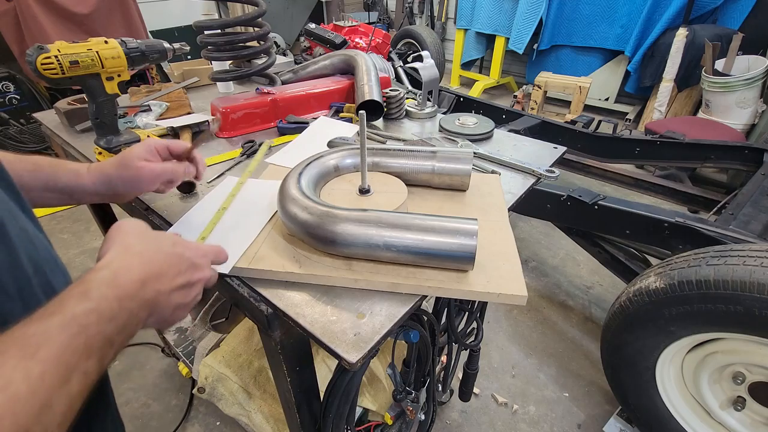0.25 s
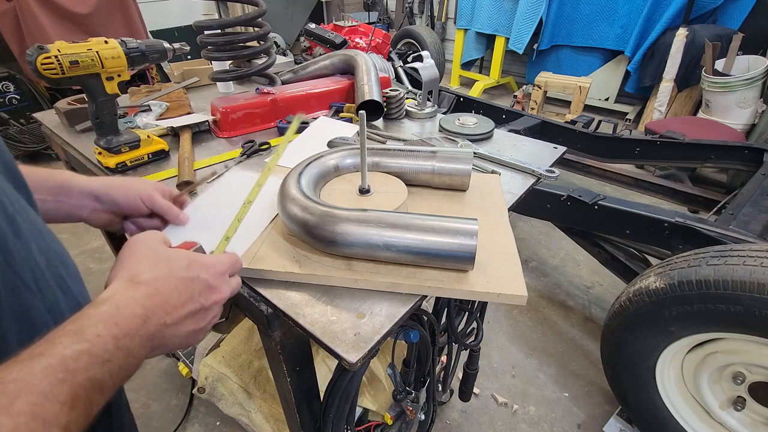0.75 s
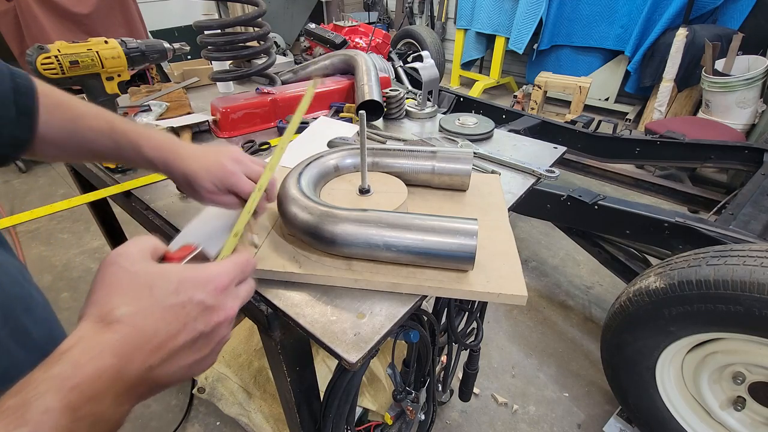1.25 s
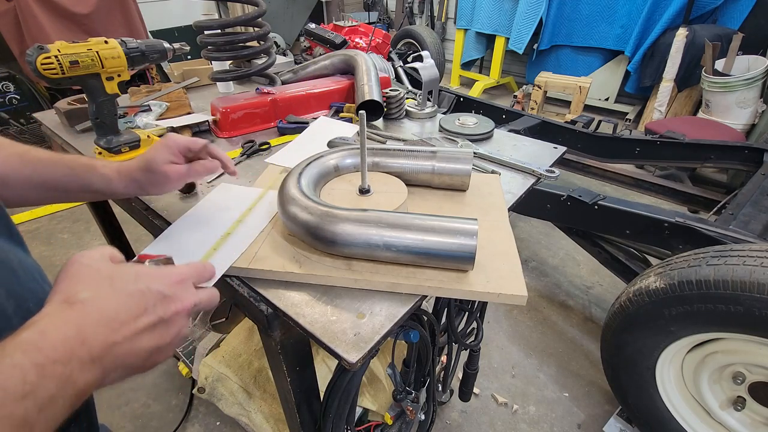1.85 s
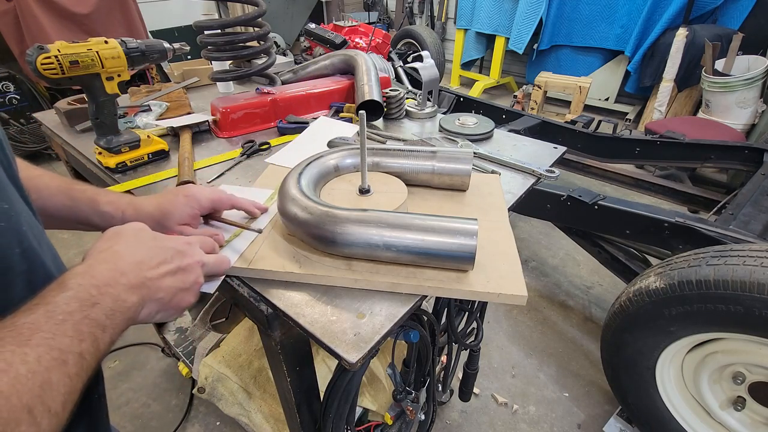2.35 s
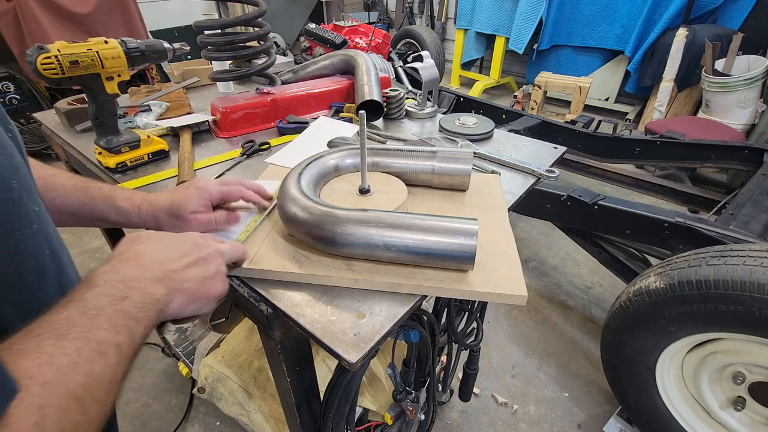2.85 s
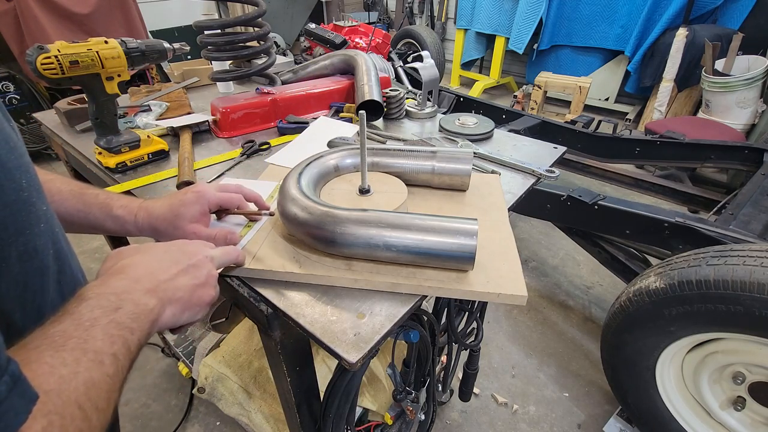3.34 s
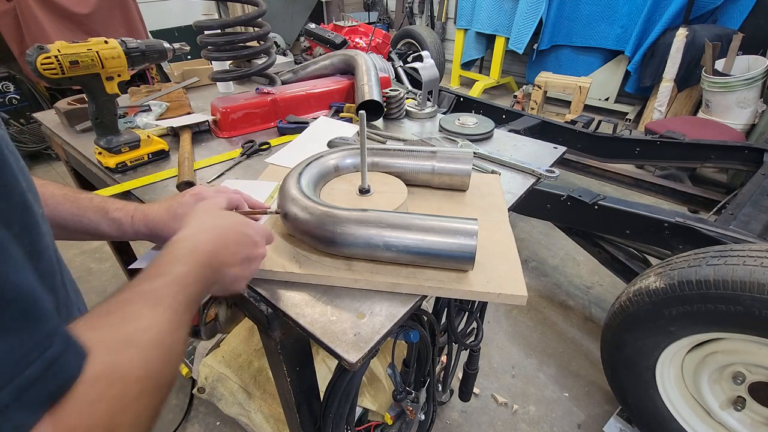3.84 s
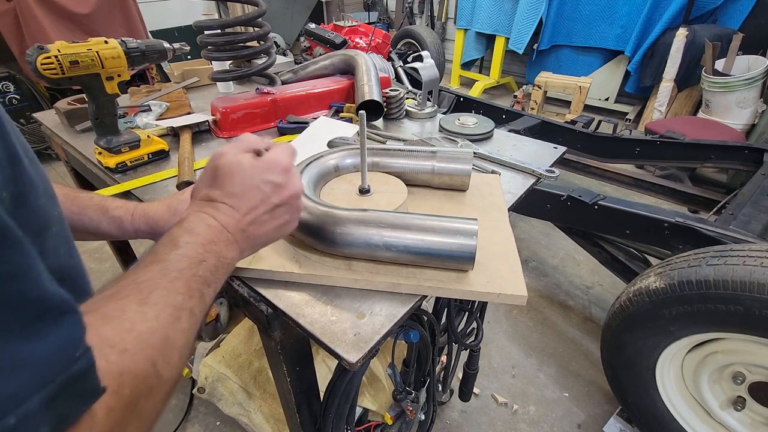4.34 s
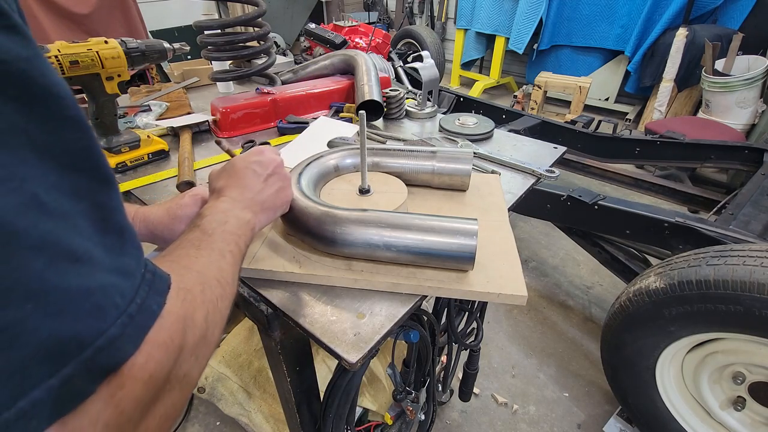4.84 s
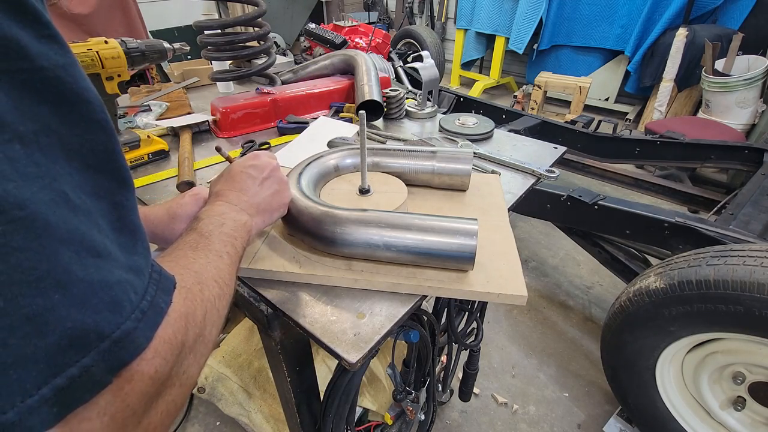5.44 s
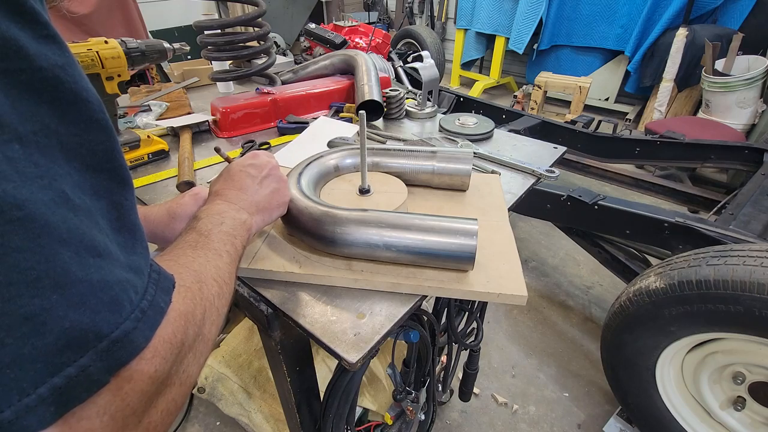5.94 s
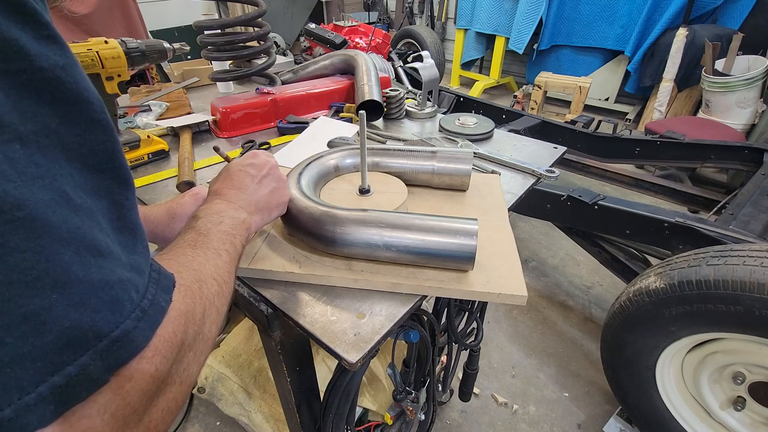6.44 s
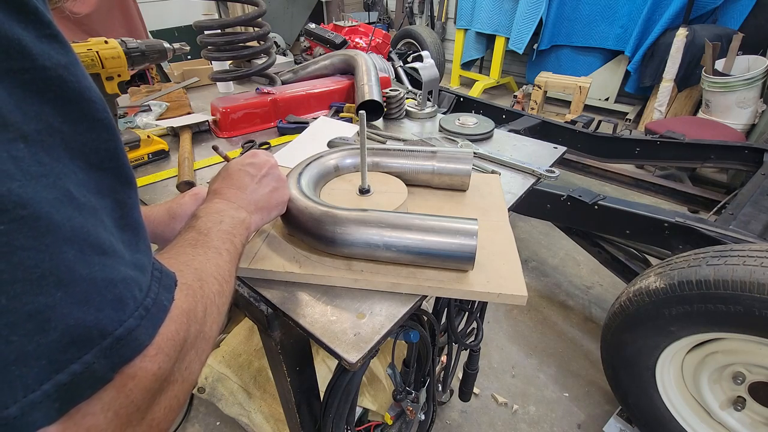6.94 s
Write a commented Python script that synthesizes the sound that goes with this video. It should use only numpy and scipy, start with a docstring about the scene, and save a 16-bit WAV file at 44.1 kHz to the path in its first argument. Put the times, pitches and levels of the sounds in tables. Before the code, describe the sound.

Ticks and papery scrapes of a tape measure on poster board, a sharp plastic clatter, then faint pen strokes in a quiet garage.

```python
"""A steel tape measure is handled on a stiff poster board at a garage workbench. Impacts of blade, hook
and fingers tick, and sliding friction hisses while the bending board pops. The blade snaps once, ringing
and chattering in its modes; the plastic case bounces on the bench; the blade hums faintly. A pen then
draws short, faint strokes. Under it all lies a diffuse rumble and hiss, and the garage's reverberation
follows every tick."""
import sys
import numpy as np
from scipy import signal
from scipy.fft import rfft, irfft, next_fast_len
from scipy.io import wavfile
from scipy.ndimage import uniform_filter1d, map_coordinates

SR = 44100
rng = np.random.default_rng(int(sys.argv[2]) if len(sys.argv) > 2 else 0)


def generate_wav(sig):
    """Save sig (samples, or channels by samples) to the path in sys.argv[1] as 16-bit PCM at SR."""
    pcm = np.round(np.clip(np.atleast_2d(sig).T, -1, 1) * 32767).astype(np.int16)
    wavfile.write(sys.argv[1], SR, pcm)


N = 316885
SPAN, PAD = 32768, 256  # samples: one short sound; margin before time zero
HZ = np.fft.rfftfreq(SPAN, 1 / SR)
T = np.arange(SPAN) / SR
SCENE_T = np.arange(N) / SR


def amp(db):
    """Amplitude ratio of a level in decibels."""
    return 10 ** (np.asarray(db) / 20)


def unit(x):
    """Normalisation to rms 1."""
    return x / np.sqrt(np.mean(x ** 2) + 1e-20)


def along(points, hz):
    """Interpolation of (frequency, value) points on a logarithmic frequency axis."""
    freqs, values = np.transpose(points)
    return np.interp(np.log(hz + 1), np.log(freqs + 1), values)


def filtered(x, response):
    """Linear filtering: the spectrum of x times a frequency response."""
    size = next_fast_len(N + SR // 2)
    return irfft(rfft(x, size) * response(np.fft.rfftfreq(size, 1 / SR)), size)[..., :N]


def band(hz, low_hz, high_hz):
    """Causal band-pass response with second-order slopes."""
    return (1j * hz / low_hz / (1 + 1j * hz / low_hz) / (1 + 1j * hz / high_hz)) ** 2


def resonances(peaks, hz):
    """Forced response of damped resonators, summed with alternating signs."""
    return sum((-1) ** k * amp(db) * 1j * hz * width / (centre ** 2 - hz * hz + 1j * hz * width)
               for k, (centre, width, db) in enumerate(peaks))


def ring(modes, longest_s):
    """Free vibration: damped modes of random phase and slightly random strength, t60 up to longest_s."""
    return sum(amp(db + rng.normal(0, 1.1) - 60 * T / min(t60, longest_s))
               * np.sin(2 * np.pi * hz * T + rng.uniform(0, 2 * np.pi)) for hz, db, t60 in modes)


def wobble(rate):
    """Smooth random modulation with rate knots a second."""
    knots = rng.standard_normal(int(N * rate / SR) + 4)
    return map_coordinates(knots, [np.arange(N) * rate / SR])


def grit(depth_db, rate):
    """Random amplitude modulation breaks noise into uneven grains."""
    return amp(depth_db * wobble(rate)) * rng.standard_normal(N)


def patchy(x, depth_db=3):
    """Spectral modulation: random gain in short patches of time and frequency."""
    spectra = signal.stft(x, nperseg=256)[2]
    field = uniform_filter1d(rng.standard_normal(spectra.shape), size=3, axis=0)
    field = uniform_filter1d(field, size=8, axis=1)
    return signal.istft(spectra * amp(depth_db * unit(field)), nperseg=256)[1][:N]


def crackle(per_s):
    """A Poisson process of clicks of very uneven size."""
    hits = rng.random(N) < per_s / SR
    return unit(hits * amp(3 * rng.exponential(size=N)) * rng.standard_normal(N))


def bursts(peak_s, db, swell_s, fade_s, hold_s=0):
    """Envelope of incoherent bursts, which add in power; swell_s and fade_s each span 20 dB."""
    step = 16
    after = np.arange(0, N, step) / SR - np.array(peak_s)[:, None]
    swell_s, fade_s, hold_s = (np.reshape(v, (-1, 1)) for v in (swell_s, fade_s, hold_s))
    drop = np.maximum(-after / swell_s, 0) + np.maximum((after - hold_s) / fade_s, 0)
    power = amp(np.array(db)[:, None] - 20 * drop) ** 2
    return np.repeat(np.sqrt(power.sum(axis=0)), step)[:N]


# Width of the diffuse field: frequency_hz, side_minus_mid_db
DIFFUSE_WIDTH = [(60, -15.5), (110, -13), (200, -9.5), (380, 1), (700, 0), (1290, 2.5), (2380, -3.5),
                 (4400, -5.5), (8120, 1), (15000, -3)]
def diffuse(hz):
    """A diffuse field arrives from all around and divides its power between mid and side."""
    side = amp(along(DIFFUSE_WIDTH, hz))
    return np.array([np.ones_like(side), side]) / np.sqrt(1 + side ** 2)


# Phase difference between the microphone ports: frequency_hz, left_lead_rad
PORT_PHASE = [(60, -0.5), (300, 1), (1200, 1), (3200, 4), (5000, 1.59), (9000, 2), (15000, 0.4)]
def ports(hz, pan_db):
    """Direct sound reaches two ports with level and phase differences; pan_db is left minus right."""
    turn = np.exp(.5j * along(PORT_PHASE, hz))
    return np.array([amp(pan_db / 2) * turn, amp(-pan_db / 2) / turn])


# Reverberation time of the garage: frequency_hz, t60_s
GARAGE_DECAY = [(200, 0.49), (1000, 0.39), (3000, 0.29), (6000, 0.25), (14000, .2)]
def garage_echo():
    """Reverberation as a fresh stereo spectrum: diffuse noise decays exponentially, treble first."""
    hz, t, spectra = signal.stft(rng.standard_normal((2, SR // 2)), SR, nperseg=256)
    fade = amp(-60 * t / along(GARAGE_DECAY, hz)[:, None]) * np.clip(t / .0071, 0, 1)
    mid, side = signal.istft(spectra * fade * diffuse(hz)[..., None], SR, nperseg=256)[1]
    pair = np.array([mid + side, mid - side])
    return rfft(pair / np.linalg.norm(pair[0]), SPAN)


def blank():
    """Stereo silence with a margin at each end."""
    return np.zeros((2, PAD + N + SPAN))


def place(out, start_s, sound, pan_db, echo_db):
    """Superposition of a short sound's direct and reverberant parts onto a padded track."""
    paths = ports(HZ, pan_db) + amp(echo_db) * garage_echo()
    delay = np.exp(-2j * np.pi * HZ * PAD / SR)
    start = round(start_s * SR)
    out[:, start:start + SPAN] += irfft(rfft(sound, SPAN) * paths * delay, SPAN)


def spread(x, pan_db, echo_db):
    """A long sound arrives directly and by convolution with the garage's impulse response."""
    echo = signal.fftconvolve(x[None], irfft(garage_echo(), SPAN), axes=1)[:, :N]
    return filtered(x, lambda hz: ports(hz, pan_db)) + amp(echo_db) * echo


# Spectrum of the rumble and hiss: frequency_hz, relative_db
AIR_SPECTRUM = [(12, -59), (20, -25.5), (41, -9.5), (65, -0.5), (130, -12.5), (142, -19), (241, -23),
                (513, -35.5), (698, -35.5), (923, -42.5), (1480, -43.5), (4180, -51), (7800, -52.5),
                (10200, -62), (11800, -48), (16000, -71)]
def air(level_db=-65.5):
    """Ambient noise forms a diffuse field whose level drifts slightly."""
    mid, side = filtered(rng.standard_normal((2, N)), lambda hz: amp(along(AIR_SPECTRUM, hz)) * diffuse(hz))
    gain = amp(level_db + .83 * wobble(1.9)) / np.std(mid)
    return gain * np.array([mid + side, mid - side])


# Pen strokes: start_s, length_s, level_db
PEN_STROKES = [(5.898, .07, -85.5), (6.152, 0.072, -77.5), (6.225, .045, -83), (6.35, .05, -81),
               (6.584, 0.076, -80), (6.753, 0.064, -78), (6.945, 0.063, -75), (7.07, 0.062, -80.5),
               (7.175, .03, -78)]
# Friction spectrum of the nib: frequency_hz, relative_db
NIB_SPECTRUM = [(550, -25), (850, -8), (1400, -8), (2170, -11), (3040, -3), (3700, -4), (4350, -7),
                (4990, -6), (5400, -9.5), (8050, -8), (10900, -30), (13100, -15), (15500, -31)]
def pen():
    """Friction at the nib gives sharply starting strokes of noise with a narrow squeak resonance."""
    pressure = sum(amp(db) * np.clip((SCENE_T - start_s) / .003, 0, 1)
                   * np.clip((start_s + length_s - SCENE_T) / .008, 0, 1)
                   for start_s, length_s, db in PEN_STROKES)
    squeak = [(5000, 110, 2)]  # centre_hz, width_hz, gain_db
    grains = patchy(grit(depth_db=3, rate=220))
    nib = unit(filtered(grains, lambda hz: amp(along(NIB_SPECTRUM, hz)) * (1 + resonances(squeak, hz))))
    return spread(pressure * nib, pan_db=-2.8, echo_db=-11)


# Shoves of board and tape: peak_s, level_db, swell_s, fade_s, relative_flutter_db, relative_hiss_db
BOARD_SHOVES = [(.31, -57.5, .07, .17, -10, -17), (.72, -68, .12, .1, -6, -20),
                (.872, -57, .15, .04, -3, -25), (.93, -43, .005, .04, -12, -25),
                (1.1, -68, .15, .25, -6, -18), (1.23, -61, .03, .3, -4, -17),
                (1.384, -54, .02, .08, -11, -8), (1.478, -38.5, .046, .028, -5, -26),
                (1.5, -55, .02, .1, 1, -14), (1.61, -64, .015, .09, 5, -10),
                (1.993, -53, .008, .07, -16, -13), (2.048, -51, .006, .3, -15, -6),
                (2.166, -53, .03, .2, -20, -10), (2.29, -35, .024, .014, -24, -10),
                (2.31, -59, .02, .3, -14, -4), (2.55, -55, .3, .03, -16, -7),
                (2.62, -41, .019, .075, -18, -8), (2.746, -48, .006, .045, -30, -9),
                (2.86, -50.5, .2, .042, -20, -17), (3.015, -40.5, .06, .065, -18, -11),
                (3.08, -59, .03, .2, -16, -7), (3.2, -58, .025, .11, -20, -12),
                (3.355, -62, .035, .05, -22, -6), (3.45, -74, .1, .5, -12, -8),
                (4.02, -77, .05, .4, -9, -9), (4.2, -79, .3, .4, -6, -3), (4.53, -78, .05, .3, -4, -12),
                (4.68, -78, .03, .13, -7, -20), (4.88, -84, .6, .2, -15, -8)]
# Friction spectrum of the board: frequency_hz, relative_db
BOARD_SPECTRUM = [(450, -40), (650, -23), (900, -10), (1200, -5), (1700, -2), (2400, 2), (3400, 1),
                  (4200, -4), (4900, -8), (8000, -8), (10400, -50), (17600, -120)]
def board_sliding():
    """Sliding friction makes a grainy scrape, with the sheet's low flutter and the blade's hiss."""
    peak_s, db, swell_s, fade_s, flutter_db, hiss_db = np.transpose(BOARD_SHOVES)
    grains = unit(grit(depth_db=2.5, rate=150) * amp(1.5 * wobble(22)))
    grains += amp(-5) * crackle(per_s=250)
    scrape = unit(filtered(patchy(grains), lambda hz: amp(along(BOARD_SPECTRUM, hz))))
    flutter = unit(filtered(grit(depth_db=4, rate=48), lambda hz: band(hz, 110, 650)))
    hiss = unit(filtered(grit(depth_db=2, rate=60), lambda hz: band(hz, 10000, 17000) ** 3))
    layers = [(scrape, 0), (flutter, flutter_db), (hiss, hiss_db)]
    rub = sum(bursts(peak_s, db + share_db, swell_s, fade_s) * noise for noise, share_db in layers)
    return spread(rub, pan_db=1.5, echo_db=-14)


# Hollow pops of the board: start_s, peak_db, pitch_hz
BOARD_POPS = [(.812, -54, 480), (.815, -57, 205), (.862, -57, 480), (.862, -61, 1150), (.928, -50, 390),
              (1.275, -61, 550), (1.458, -51, 330), (1.492, -54, 105), (1.596, -54, 1120),
              (1.598, -57, 450), (2.1, -55, 800), (2.63, -54, 620)]
def board_pops(t60_cycles=18, rise_cycles=.6):
    """The bending sheet sounds one damped mode per pop, so lower notes last longer."""
    out = blank()
    for start_s, db, pitch_hz in BOARD_POPS:
        cycles = pitch_hz * T
        envelope = amp(-60 * cycles / t60_cycles) * (1 - np.exp(-cycles / rise_cycles))
        note = envelope * np.sin(2 * np.pi * cycles)
        place(out, start_s, amp(db) * note / abs(note).max(), pan_db=3, echo_db=-13)
    return out[:, PAD:PAD + N]


# Woody knocks: start_s, peak_db, low_edge_hz, high_edge_hz, pan_db
SHADED_KNOCKS = [(4.3176, -29, 300, 5000, -5), (6.8254, -46, 1000, 2000, 3)]
def knocks(t60_s=.003):
    """A brief force gives a broadband clack; in acoustic shadow, it is heard mostly as reverberation."""
    out = blank()
    for start_s, db, low_hz, high_hz, pan_db in SHADED_KNOCKS:
        push = amp(-60 * T / t60_s) * (1 + .12 * rng.standard_normal(SPAN))
        clack = irfft(rfft(np.diff(push, prepend=0)) * band(HZ, low_hz, high_hz) ** 1.7, SPAN)
        place(out, start_s, amp(db) * clack / abs(clack).max(), pan_db, echo_db=7)
    return out[:, PAD:PAD + N]


# A brush against the resting blade: peak_s, level_db, swell_s, fade_s
BLADE_BRUSH = [(4.92, -81, .3, .03)]
# Resonances of the resting blade: centre_hz, width_hz, gain_db
HUM_RESONANCES = [(3040, 28, -1), (4950, 29, -4), (5610, 30, -1), (6450, 50, -11)]
def blade_hum():
    """Noise excites narrow resonances of the blade: thin tones swell faintly and stop."""
    tones = unit(filtered(rng.standard_normal(N), lambda hz: resonances(HUM_RESONANCES, hz)))
    return spread(bursts(*np.transpose(BLADE_BRUSH)) * tones, pan_db=-1.5, echo_db=-9)


# Tugs of tape out of its case: start_s, level_db, hold_s, fade_s, relative_ring_db
TAPE_TUGS = [(0, -43.5, .022, .03, 3), (.04, -52, .02, .02, 5), (.129, -44, .01, .012, 5),
             (.15, -57, .03, .03, 6), (.208, -50.5, .046, .015, -4), (.3, -61, .03, .03, -4),
             (.35, -60, .02, .02, 1), (.404, -52, .008, .01, 4), (1.13, -70, .03, .02, -3)]
# Resonances of the rubbing blade: centre_hz, width_hz, gain_db
RUB_RESONANCES = [(4100, 900, -11), (5700, 300, -12), (6500, 300, -13), (9500, 2500, -24),
                  (12500, 1400, -18), (14300, 1500, -20)]
# Resonances of the case's mouth: centre_hz, width_hz, gain_db
MOUTH_RESONANCES = [(2620, 160, 0), (3740, 80, 0)]
def tape_tugs(swell_s=.006, rub_db=-3.5):
    """Friction of the blade drives the mouth of the case, which resonates more on some tugs."""
    start_s, db, hold_s, fade_s, ring_db = np.transpose(TAPE_TUGS)
    friction = grit(depth_db=3.5, rate=160)
    rub, ringing = filtered(
        friction, lambda hz: [resonances(RUB_RESONANCES, hz), resonances(MOUTH_RESONANCES, hz)])
    sound = sum(bursts(start_s, db + share_db, swell_s, fade_s, hold_s) * unit(noise)
                for noise, share_db in ((rub, rub_db), (ringing, ring_db)))
    return spread(sound, pan_db=2, echo_db=-19)


# Contacts of the case with the bench: start_s, level_db
CASE_BOUNCES = [(3.7368, -21), (3.7435, -23), (3.752, -32), (3.771, -33)]
# Modes of the case on the bench: pitch_hz, level_db, t60_s
CASE_MODES = [(400, -22, .03), (673, -18, .11), (820, -2, .011), (921, -15, .07), (1650, -10, .03),
              (2115, -4, .055), (2375, -5, .05), (2765, -5, .035), (2975, -5, .045), (3200, -2, .05),
              (3480, -10, .05), (3640, -8, .03), (4160, -7, .035), (4640, -13, .015), (5040, -14, .015)]
def case_landing():
    """Impact excitation: each bounce of the plastic case gives a noisy crack and rings its modes."""
    out = blank()
    crack_band = band(HZ, 1500, 4600) ** 1.6 + amp(-13) * band(HZ, 11000, 17000)
    for start_s, db in CASE_BOUNCES:
        puff = rfft(amp(-60 * T / .009) * rng.standard_normal(SPAN))
        crack = amp(22) * irfft(puff * crack_band, SPAN)
        knock = ring(CASE_MODES, longest_s=.2) * (1 - np.exp(-T / .0006))
        place(out, start_s, amp(db) * (knock + crack), pan_db=4.5, echo_db=-4.5)
    return out[:, PAD:PAD + N]


# Modes of the steel blade: pitch_hz, level_db, uncapped_t60_s
BLADE_MODES = [(1070, -29, .03), (1560, -24, .03), (2050, -24, .02), (2600, -21, .03), (3042, -9, 0.023),
               (4037, -14, 0.14), (5020, 0.5, 0.26), (5986, -11, .07), (6330, -11, .05), (6837, -9.5, 0.08),
               (7350, -6, 0.19), (8226, -4, 0.074), (8940, -7, 0.21), (10600, -17.5, 0.14),
               (11920, -1.5, 0.064), (12630, -3, 0.1), (13280, -12, 0.13), (13770, -10, 0.073)]
# Resonances of the shaking blade: centre_hz, width_hz, bent_db, flat_db
CHATTER_RESONANCES = [(1080, 27, -21, -27), (1620, 25, -20, -33), (2350, 25, -19, -32),
                      (2650, 25, -18, -22), (3050, 40, -8, -13), (3490, 24, -16, -20), (4035, 25, -10, -4),
                      (4645, 27, -2, -9), (4950, 27, -2, -10), (5610, 30, -15, -3), (5990, 25, -6, -12),
                      (6330, 30, -6, -4), (6835, 30, -10, -8), (7280, 22, -5, -12), (7490, 28, -20, -11),
                      (8270, 40, -10, -10), (8910, 30, -5, -10), (9960, 30, -18, -10),
                      (11200, 90, -16, -13), (11900, 90, -13, -12), (12830, 110, -14, -14),
                      (13300, 100, -13, -15), (14100, 120, -15, -14)]
# Envelope of the chatter: time_s, level_db
CHATTER_LEVELS = [(1.795, -25), (1.819, -36), (1.9, -39), (1.95, -62)]
def tape_snap(snap_s=1.7935, flatten_s=(1.83, 1.87)):
    """The curved blade snaps into free vibration and chatters; its resonances rebalance as it flattens."""
    out = blank()
    ping = amp(-27) * ring(BLADE_MODES, longest_s=.07) * (1 - np.exp(-T / .0015))
    place(out, snap_s, ping, pan_db=-2.5, echo_db=-7.5)
    crack = amp(-24 - 60 * T / .03) * np.diff(rng.standard_normal(SPAN), prepend=0)
    place(out, snap_s, crack, pan_db=-2.5, echo_db=-10)
    peaks = np.array(CHATTER_RESONANCES)
    shake = patchy(grit(depth_db=2.5, rate=130))
    bent, flat = unit(filtered(shake, lambda hz: [resonances(peaks[:, [0, 1, k]], hz) for k in (2, 3)]))
    flatness = np.interp(SCENE_T, flatten_s, (0, 1))
    buzz = np.sqrt(1 - flatness) * bent + np.sqrt(flatness) * flat
    rasp = unit(filtered(grit(depth_db=1.5, rate=200), lambda hz: band(hz, 3500, 14000) ** 1.5))
    times_s, levels_db = np.transpose([(1.7, -110), (1.79, -58), *CHATTER_LEVELS, (1.99, -120)])
    chatter = amp(np.interp(SCENE_T, times_s, levels_db)) * unit(buzz + amp(-7) * rasp)
    return out[:, PAD:PAD + N] + spread(chatter, pan_db=5, echo_db=-14.5)


# Ticks of tape and fingers on the board (thud, hollow and hiss are relative to the level):
# start_s, level_db, thud_db, hollow_db, hiss_db, centre_hz, pan_db
TAPE_TICKS = [(0.0024, -40, -26, -19, -17, 3900, 1), (0.1171, -54, -27, -25, -14, 2740, -11),
              (0.1375, -44, -21, -25, -18, 2700, 12), (0.2075, -45, -29, -30, -5, 6300, -6),
              (0.2364, -46, -26, -29, -6, 2710, -7), (0.369, -52, -25, -15, -15, 2600, 1),
              (0.402, -45, -28, -26, -9, 2630, 6), (0.4833, -47, -20, -25, -17, 2660, -1.5),
              (0.5673, -54, -8, -26, -7, 2640, 2.5), (0.6399, -48, -26, -26, -15, 3770, -1.5),
              (0.7504, -49, -30, -3, -36, 3960, 6), (0.8096, -43, -8, -4, -33.5, 2030, 1),
              (0.855, -53, -5, -8, -25, 3000, 1), (0.9285, -30.5, -34, -21.5, -35, 2910, 10.5),
              (0.9404, -52, -8, -14, -25.5, 2700, 24), (1.0705, -55, -22, -20, -20, 3730, -1),
              (1.2012, -44, -5, -2, -31, 2800, 0), (1.245, -58, -10, -3, -25, 3000, 1),
              (1.281, -55, -10, -8, -25, 3500, 1), (1.3823, -35, -24, -8, -21, 4800, 3.5),
              (1.4471, -41, -5, -3, -18, 5140, 0), (1.4731, -28, -5, -4, -27, 2410, 13),
              (1.594, -44, -8, -2, -26, 5286, 6), (1.9923, -35.5, -23, -17, -30, 5620, 11),
              (2.0495, -27, -43, -14, -20.5, 2690, 3.5), (2.0991, -46, -19, 6, -7, 2550, 1),
              (2.1161, -43.5, -19, -4, -13, 2720, 2.5), (2.1655, -36, -32, -19, -25, 4840, 7),
              (2.1714, -31.5, -32, -26, -28, 5340, -3.5), (2.186, -47, -25, -20, 0, 6000, 2),
              (2.2119, -36, -19, -6, -7, 3520, 4), (2.232, -37.5, -19, -13, -13, 3996, 0.5),
              (2.2702, -35, -28, -12, -20.5, 3900, 6), (2.2844, -23.5, -23, -19, -15, 3380, 3),
              (2.2902, -26.5, -32, -12, -19, 3030, 0), (2.515, -45, -31, -14, -1, 5050, 1),
              (2.5416, -43, -29, -9, -22.5, 6000, 1), (2.6216, -32, -37, -22, -15.5, 4540, 14),
              (2.6683, -40, -30, -7.5, -27, 3260, 8), (2.728, -48, -8, 1, -25, 2000, 1),
              (2.7472, -37.5, -30, -0.5, -10, 5900, 0), (2.8809, -33, -24, -8, -16, 2720, 6.5),
              (2.971, -47, -20, -5, -15, 3000, 3), (3.0185, -20, -40, -29, -10, 5973, 9),
              (3.5684, -52, 12, 8, -26, 2780, 8), (4.3176, -47, -30, -25, -20, 5000, -2),
              (4.234, -65, -5, 1, -15, 6200, -1), (4.6309, -64, -18, -14, -26, 2100, -11),
              (4.6793, -64, -9, 3, -31, 2070, -3), (6.8254, -50, -30, -12, -25, 2750, 0)]
def tape_ticks(ring_hz=2200, ring_width_hz=160, ring_db=6):
    """Impacts, the harder the shorter, excite a broad resonance, the board's thud and hollow, and hiss."""
    out = blank()
    thud, hollow, hiss = band(HZ, 210, 470), band(HZ, 900, 1500) ** 2, band(HZ, 11000, 17000) ** 3
    for start_s, db, thud_db, hollow_db, hiss_db, centre_hz, pan_db in TAPE_TICKS:
        t60_s = .02 * amp(-.3 * (db + 40))
        envelope = amp(-60 * T / t60_s) * (1 - np.exp(-T / .0007))
        # each tick has three short rings of its own
        rings = [(ring_hz * np.exp(.45 * u), ring_width_hz, ring_db) for u in rng.standard_normal(3)]
        puff = rfft(rng.standard_normal(SPAN) * envelope) * (1 + resonances(rings, HZ))
        body = band(HZ, .65 * centre_hz, 1.45 * centre_hz) ** 1.6
        body *= 1 + resonances([(centre_hz, 350, 6)], HZ)
        parts = irfft(puff * [body, thud, hollow, hiss], SPAN)
        # equal energy in every part before its level is applied
        balance = np.linalg.norm(envelope) / envelope.max() / np.linalg.norm(parts, axis=1)
        gains = .5 * balance * amp(db + np.array([0, thud_db, hollow_db, hiss_db]))
        place(out, start_s, gains @ parts, pan_db, echo_db=-12)
    return out[:, PAD:PAD + N]


def scene():
    """Superposition of the impacts, the sustained sounds and the garage's ambient noise."""
    impacts = tape_ticks() + board_pops() + knocks() + case_landing() + tape_snap()
    return impacts + blade_hum() + tape_tugs() + board_sliding() + pen() + air()


# Frequency response of the microphone: frequency_hz, gain_db
MIC_RESPONSE = [(5000, 1.5), (8000, -0.5), (10000, -4), (12500, 2.5), (14500, 0.5), (16200, -8)]
def record(dry, top_hz=16200):
    """The microphone's response dips below its port resonance and ends at a band limit."""
    return filtered(dry, lambda hz: amp(along(MIC_RESPONSE, hz)) * (hz < top_hz))


dry = scene()
out = record(dry)
generate_wav(out)
```